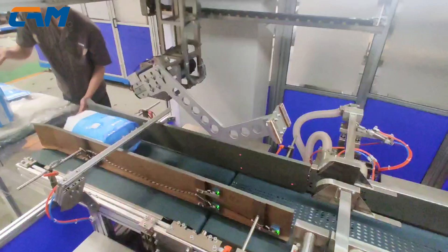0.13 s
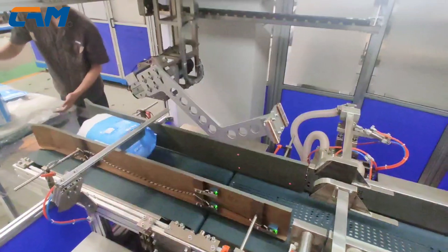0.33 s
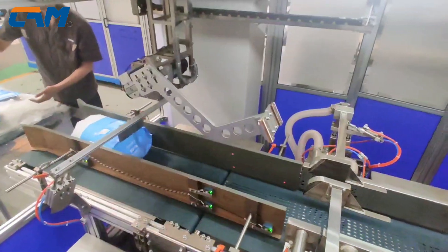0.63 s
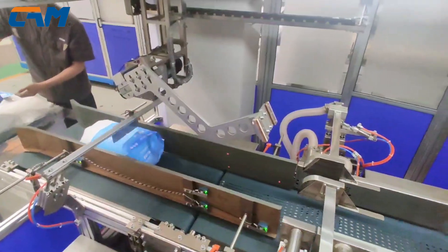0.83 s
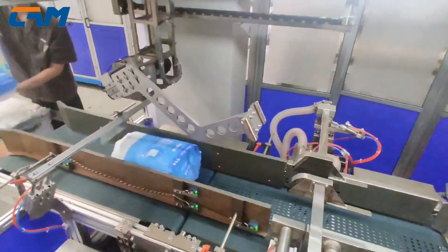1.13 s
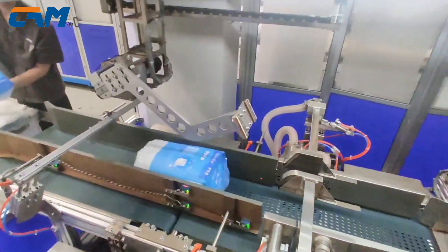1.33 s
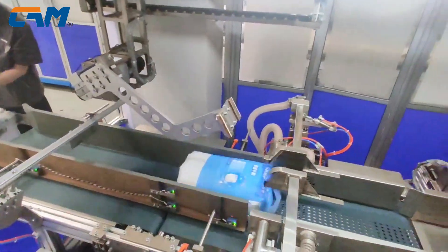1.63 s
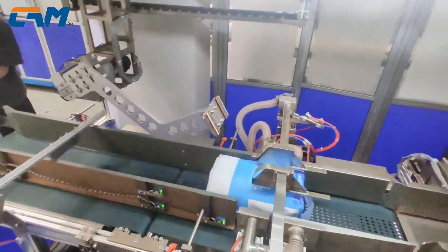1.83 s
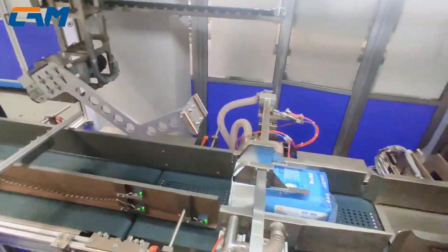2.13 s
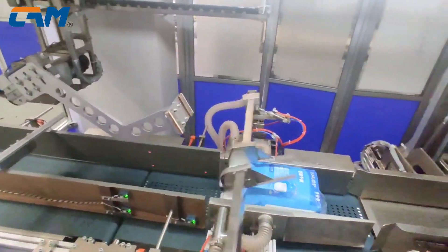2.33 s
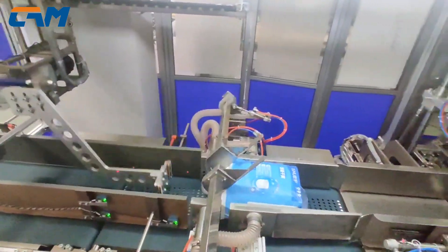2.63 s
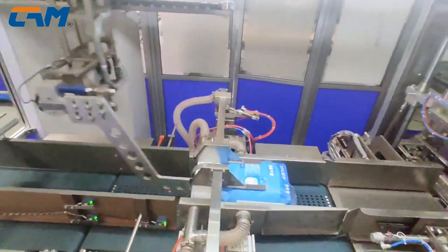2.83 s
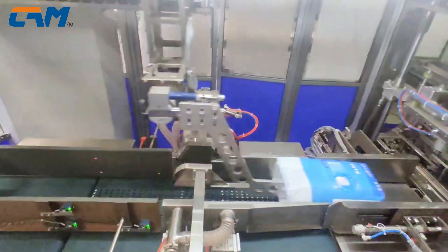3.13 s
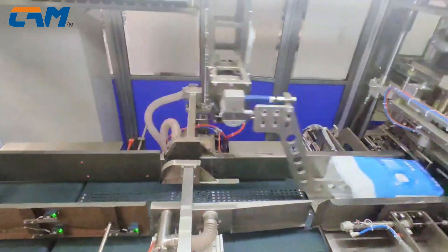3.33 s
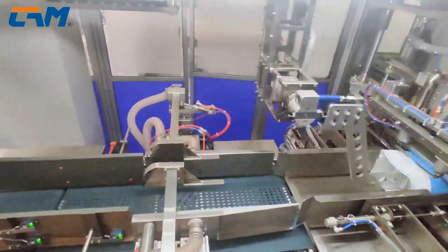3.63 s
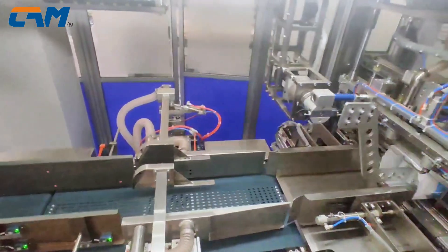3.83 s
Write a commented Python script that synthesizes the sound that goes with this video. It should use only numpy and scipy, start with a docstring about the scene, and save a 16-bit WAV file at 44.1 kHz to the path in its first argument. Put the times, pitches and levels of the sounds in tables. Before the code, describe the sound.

A packing machine's suction blower dominates. Factory hum and rumble fade in from near silence, with soft air puffs and a dull thump around 0.4-0.5 s. A sharp gate clack rings at 0.65 s; the blower then climbs raggedly, reaching a wavering high whistle and resonant roar by 1.2 s. Knocks and puffs cluster at 2.4-2.6 s, the roar dulls, air hisses, a servo arm whirs, and another knock lands at 3.3 s.

```python
"""The blower of a bag-packing machine's suction belt: its blade tone climbs to a steady whistle
while shaped noise roars through ducts and housing. The factory hall around it is noise, motor hum and rumble.
A pneumatic gate clacks before the spin-up as noise bursts and struck modes, valves puff and hiss as noise,
the frame knocks as rough resonances, and a servo arm whines in tones as it pushes the bag on.
The sound is mono and fades in."""
import sys
import numpy as np
from scipy import signal
from scipy.fft import rfft, irfft, next_fast_len
from scipy.io import wavfile
from scipy.ndimage import uniform_filter1d, map_coordinates

SR = 44100
rng = np.random.default_rng(int(sys.argv[2]) if len(sys.argv) > 2 else 0)


def dump(signal):
    """Clip the signal to [-1, 1] and save it as 16-bit WAV at the path in sys.argv[1]."""
    limited = np.clip(np.atleast_2d(signal).T, -1, 1)
    pcm = np.round(limited * 32767).astype(np.int16)
    wavfile.write(sys.argv[1], SR, pcm)


N = 176400

# Colour of escaping air, for the valves and the gate's crack. Each row: frequency in Hz, relative level in dB.
AIR_HISS = [(1500, -20), (4000, -3.5), (6000, -1), (8000, 2), (9200, -3), (10700, -6.5), (12000, -12.5)]
# Colour of a hard blow, for gate and frame. Each row: frequency in Hz, relative level in dB.
BLOW = [(80, -10), (200, 1.5), (450, -2.5), (1000, -7), (1400, -11), (2100, -8.5), (4400, -19.5),
        (6800, -13), (11000, -35)]


def amp(db):
    """Decibels to gain."""
    return 10 ** (np.asarray(db) / 20)


def unit(x):
    """Scale to rms 1."""
    return x / np.sqrt(np.mean(x ** 2) + 1e-20)


def clock():
    """The time of each sample in seconds."""
    return np.arange(N) / SR


def along(points, hz):
    """Read (Hz, value) points at hz on a log frequency axis."""
    f, v = np.transpose(points)
    return np.interp(np.log(hz + 1), np.log(f + 1), v)


def curve(rows):
    """Straight lines through (seconds, value) points, one value per sample."""
    return np.interp(clock(), *np.transpose(rows))


def wobble(rate):
    """A smooth random curve with rate knots a second."""
    knots = rng.standard_normal(int(N * rate / SR) + 4)
    return map_coordinates(knots, [clock() * rate])


def filtered(x, response):
    """Multiply the spectrum of x by a response of frequency."""
    m = next_fast_len(N + 8192)
    return irfft(rfft(x, m) * response(np.fft.rfftfreq(m, 1 / SR)), m)[:N]


def noise(spectrum, peaks=(), unsteady_db=0):
    """Noise of rms 1 with a spectrum, (Hz, width Hz, lift dB) resonances and a gain random in time and pitch."""
    z = signal.stft(rng.standard_normal(N), nperseg=512)[2]
    field = uniform_filter1d(rng.standard_normal(z.shape), size=7, axis=0)
    field = uniform_filter1d(field, size=9, axis=1)
    unsteady = signal.istft(z * amp(unsteady_db * unit(field)), nperseg=512)[1][:N]

    def response(f):
        lift = sum(db / (1 + (2 * (f - hz) / width) ** 2) for hz, width, db in peaks)
        return amp(along(spectrum, f) + lift)

    return unit(filtered(unsteady, response))


def tone(hz, rough, width_hz):
    """A sine with a noisy skirt from random modulation; its rms is about 1 while rough is small."""
    phase = 2 * np.pi * np.cumsum(hz * np.ones(N)) / SR
    in_phase = (1 + rough * wobble(width_hz)) * np.sin(phase)
    return np.sqrt(2) * (in_phase + rough * wobble(width_hz) * np.cos(phase))


def burst(s, attack_s, hold_s, fall_db_per_s):
    """An envelope with a linear attack and a fall in dB that sets in hold_s after the start."""
    t = clock() - s
    return np.clip(t / attack_s, 0, 1) * amp(-fall_db_per_s * np.maximum(t - hold_s, 0))


def ring(s, db, hz, t60):
    """One struck resonance, slightly rough, that dies away by 60 dB in t60 seconds."""
    return amp(db) * burst(s, 0.0044, 0, 60 / t60) * tone(hz, rough=0.13, width_hz=0.12 * hz)


def feed_motor():
    """A motor hum that sags in pitch and dies as the motor brakes."""
    # One row: running tone in Hz, level in dB, start of braking in seconds, time to stop in seconds.
    motor = (161, -34, 0.46, 0.44)
    hz, db, brake_s, coast_s = motor
    slowing = np.clip((clock() - brake_s) / coast_s, 0, 1) ** 2
    phase = 2 * np.pi * np.cumsum(hz * (1 - slowing / 2)) / SR
    return amp(db) * (1 - slowing) * np.sqrt(2) * np.sin(phase)


def hall():
    """Other machines as shaped noise, the belt motors as rough hum tones, the feed motor and a low rumble."""
    # Colour of the hall. Each row: frequency in Hz, relative level in dB.
    hall_colour = [(25, -20), (68, -10), (100, 4), (125, -2.5), (320, -0.5), (1200, -15), (7000, -34),
                   (12000, -55)]
    # Swell of the hall. Each row: time in seconds, level in dB.
    hall_level = [(.6, -31.5), (1.1, -27.5), (2.8, -31.5), (3.5, -27)]
    # Belt motor tones. Each row: frequency in Hz, level in dB before the hum's own level curve.
    hum_tones = [(274.5, -34), (312, -37), (474, -43)]
    # Level curve over all hum tones. Each row: time in seconds, gain in dB.
    hum_level = [(.45, 1.5), (.55, 0), (2, -11.5)]
    # Low rumble of the frame. Each row: time in seconds, level in dB.
    rumble_level = [(.8, -44), (1.08, -41.5), (1.4, -67), (2.1, -44), (2.7, -42.5)]
    machines = amp(curve(hall_level)) * noise(hall_colour)
    hum = sum(amp(db) * tone(hz, rough=0.19, width_hz=14) for hz, db in hum_tones)
    rumble = amp(curve(rumble_level)) * noise([(42, -4), (150, -33), (900, -100)])
    return machines + amp(curve(hum_level)) * hum + feed_motor() + rumble


def valves():
    """Air bursts out as short resonant puffs of noise, and vents as a longer, unsteady hiss."""
    # Exhaust puffs. Each row: start in seconds, level in dB, time before the fall in seconds,
    # fall in dB per second, resonance in Hz, its lift in dB.
    puff_rows = [(0.407, -36.5, .04, 123, 2200, 10.5), (0.492, -28.5, 0.024, 196, 6730, 4),
                 (2.413, -23.5, 0.021, 597, 3650, 6), (3.216, -22.5, 0.022, 702, 5100, 9.5)]
    # Colour of a puff. Each row: frequency in Hz, relative level in dB.
    puff_colour = [(500, -14), (2000, -5.5), (8000, -5.5), (11000, -14.5)]
    # Venting air. Each row: time in seconds, level in dB.
    hiss_level = [(.8, -46), (1.15, -43.5), (2.25, -38.5), (2.6, -29.5), (3.02, -29.5), (3.12, -41),
                  (4, -71)]
    out = amp(curve(hiss_level)) * noise(AIR_HISS, unsteady_db=3.0)
    for s, db, hold_s, fall, hz, lift in puff_rows:
        out += amp(db) * burst(s, 0.0062, hold_s, fall) * noise(puff_colour, [(hz, 650, lift)])
    return out


def knocks():
    """Dull blows on the frame: each rings one rough resonance and adds a faint noise crack."""
    # Each row: start in seconds, level in dB, ring in Hz, time to fall 60 dB in seconds.
    knock_rows = [(.487, -30.5, 45.4, 1.3), (.49, -28.5, 88.4, 0.79), (2.396, -15.5, 785, 0.12),
                  (2.495, -23.5, 191, 0.23), (2.56, -16.5, 437.6, 0.21), (2.595, -27, 36.6, 0.21),
                  (3.34, -17, 672, 0.15)]
    crack_db = -6.5  # relative to the ring
    crack = noise(BLOW)
    out = np.zeros(N)
    for s, db, hz, t60 in knock_rows:
        out += ring(s, db, hz, t60) + amp(db + crack_db) * burst(s, 0.00078, 0, 700) * crack
    return out


def gate():
    """The gate snaps against its stop and bounces; its plate rings on in a few low modes."""
    # Clack and bounces. Each row: start in seconds, level in dB.
    clack_rows = [(0.653, -16.5), (.66, -15), (0.678, -22)]
    # Plate modes. Each row: frequency in Hz, level in dB, time to fall 60 dB in seconds.
    plate_modes = [(206.5, -24.5, 0.2), (332.6, -21.5, 0.54), (528, -23, 0.38), (1055, -28, 0.29)]
    # Decay of the clack noise. Each row: frequency in Hz, time to fall 60 dB in seconds.
    clack_t60 = [(200, 0.38), (1000, .24), (10000, 0.2)]
    first_s = clack_rows[0][0]
    out = amp(-28) * burst(first_s, 0.0011, 0, 900) * noise(AIR_HISS)  # sharp crack of the first contact
    out += sum(ring(first_s, db, hz, t60) for hz, db, t60 in plate_modes)
    for s, db in clack_rows:
        hz, t, z = signal.stft(noise(BLOW), SR, nperseg=256)
        decay = amp(-60 * np.maximum(t - s, 0) / along(clack_t60, hz)[:, None])
        tail = signal.istft(z * decay, SR, nperseg=256)[1][:N]
        out += amp(db) * np.clip((clock() - s) / 0.0036, 0, 1) * tail
    return out


def duct_air():
    """Turbulent air coloured by duct and housing resonances, which the bag damps as it covers the belt."""
    # Colour of the air. Each row: frequency in Hz, relative level in dB.
    air_colour = [(80, -13.5), (200, -8), (400, -4), (760, -5.5), (1020, -11), (1800, -7), (2400, -10),
                  (3400, -14.5), (4600, -20.5), (6500, -17), (8300, -20), (10000, -36.5)]
    # Duct and housing resonances and one notch. Each row: frequency in Hz, width in Hz, lift in dB.
    resonances = [(293, 26, 7), (406, 31, 9), (486, 25, 9.5), (633.5, 42, 14), (793.3, 35, 13),
                  (1375, 13.5, 13.5), (1770, 23, 9.5), (1940, 70, 7.5), (2250, 17, 11.5), (3330, 80, -15)]
    # The bag covers the suction holes. One row: start in seconds, length in seconds, share of the lift that stays.
    cover = (2.434, 0.28, 0.69)
    cover_s, cover_length, stays = cover
    covered = np.clip((clock() - cover_s) / cover_length, 0, 1)
    damped_resonances = [(hz, width, stays * db) for hz, width, db in resonances]
    free = noise(air_colour, resonances, unsteady_db=1.1)
    damped = noise(air_colour, damped_resonances, unsteady_db=1.1)
    return np.sqrt(1 - covered) * free + np.sqrt(covered) * damped


def blower():
    """Speed sets the blade tone, ragged while it climbs, and the strength and brightness of the air roar."""
    # It spins up, then sags a little under the bag. Each row: time in seconds, blade tone in Hz.
    speed = [(.66, 500), (.88, 1500), (1.21, 2750), (1.28, 2822), (2.45, 2827), (2.75, 2815), (3.3, 2827)]
    # Blade tone. Each row: time in seconds, level in dB.
    whistle_level = [(.85, -43), (.93, -28), (1.16, -28.5), (1.32, -30), (1.45, -42), (1.53, -32),
                     (1.6, -44), (1.64, -34), (1.87, -28), (1.92, -47.5), (1.97, -31), (2.42, -28.5),
                     (2.52, -32.5), (2.72, -26.5), (3.2, -29), (3.37, -21.5), (3.5, -28), (3.58, -22),
                     (3.68, -32), (3.8, -26.5)]
    # Air roar at full speed. Each row: time in seconds, level in dB.
    roar_level = [(1.0, -17), (1.2, -18.5), (1.5, -22), (1.8, -21.5), (2.38, -20), (2.5, -23.5),
                  (2.8, -25.5), (3.1, -23), (4, -25.5)]
    roar_db_per_decade, fizz_db_per_decade = 46, 21  # per decade of speed; the fizz adds to the roar's growth
    fizz_above_hz = 2400
    steady_rough, rough_per_hz = 0.22, 0.0017  # the second for each Hz below full speed
    hz = curve(speed)
    decades = np.log10(hz / hz.max())
    air = duct_air()
    body = filtered(air, lambda f: 1 / (1 + (f / fizz_above_hz) ** 10))
    fizz = amp(fizz_db_per_decade * decades) * (air - body)
    roar_db = curve(roar_level) + roar_db_per_decade * decades + 0.3 * wobble(25.08)
    roar = amp(roar_db) * (body + fizz)
    rough = steady_rough + rough_per_hz * (hz.max() - hz)
    # Divide out the power that the roughness adds.
    whistle = amp(curve(whistle_level)) * tone(hz, rough, width_hz=70) / np.sqrt(1 + 2 * rough ** 2)
    switched_on = np.clip((clock() - speed[0][0]) * 10, 0, 1)
    return switched_on * (roar + whistle)


def drive_rasp():
    """A drive rasps briefly: a very rough tone that rises in pitch under a half-sine swell."""
    # One row, read backwards in time: end in seconds, minus the length in seconds, pitch at the end in Hz,
    # pitch at the start in Hz, level in dB.
    rasp_row = (1, -0.07, 1900, 1151, -22)
    end_s, minus_length, end_hz, start_hz, db = rasp_row
    to_go = np.clip((clock() - end_s) / minus_length, 0, 1)  # 1 at the start, 0 at the end
    hz = end_hz + (start_hz - end_hz) * to_go
    return amp(db) * np.sin(np.pi * to_go) * unit(tone(hz, rough=1.9, width_hz=580))


def servo_arm():
    """The carriage travels along its rail as unsteady resonant noise; the drives whine in rough tones and rasp."""
    # Travel noise. Each row: time in seconds, level in dB.
    travel_level = [(2.3, -62), (2.55, -32), (2.8, -34), (3.1, -23), (3.27, -30), (3.55, -24.5)]
    # Colour of the travel noise. Each row: frequency in Hz, relative level in dB.
    travel_colour = [(120, -18), (220, -8), (680, -2), (950, -7), (1800, -6.5), (4000, -15), (7500, -13.5),
                     (11000, -30.5)]
    # Rail resonances. Each row: frequency in Hz, width in Hz, lift in dB.
    rail = [(204, 25, 12), (672, 17, 9.4)]
    # Servo tones. Each row: start in seconds, end in seconds, frequency in Hz, level in dB.
    whine_rows = [(2.84, 4.1, 2734, -36), (2.572, 2.635, 5372, -33), (2.745, 2.82, 5800, -38),
                  (2.915, 3.012, 5370, -27.5)]
    edge_s = .03  # ramp centred on each start and end
    t = clock()
    out = amp(curve(travel_level)) * noise(travel_colour, rail, unsteady_db=3.5)
    for start, end, hz, db in whine_rows:
        gain = np.clip(np.minimum(t - start, end - t) / edge_s + .5, 0, 1)
        out += amp(db) * gain * tone(hz, rough=.3, width_hz=60)
    return out + drive_rasp()


def scene():
    """All sources, the same in both channels."""
    mono = hall() + valves() + knocks() + gate() + blower() + servo_arm()
    return np.array([mono, mono])


def record(dry):
    """Fade the sound in and cut everything above the band limit."""
    # Fade-in, ending slightly above unity. Each row: time in seconds, gain in dB.
    fade = [(.108, -67), (.13, -17.5), (.23, -11.5), (.36, -4.5), (.65, -2.5), (1.1, 1.5)]
    top_hz = 12100
    return np.array([filtered(x * amp(curve(fade)), lambda hz: hz < top_hz) for x in dry])


dry = scene()
out = record(dry)
dump(out)
```